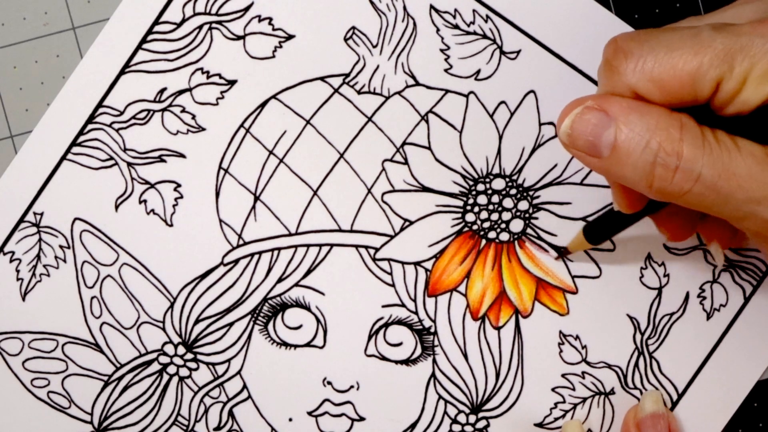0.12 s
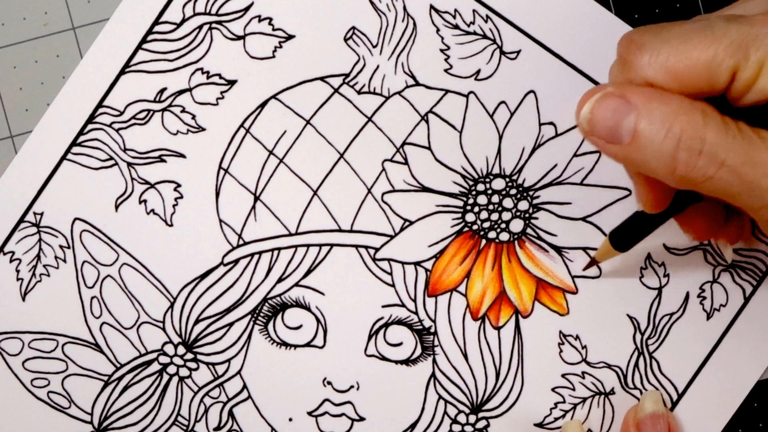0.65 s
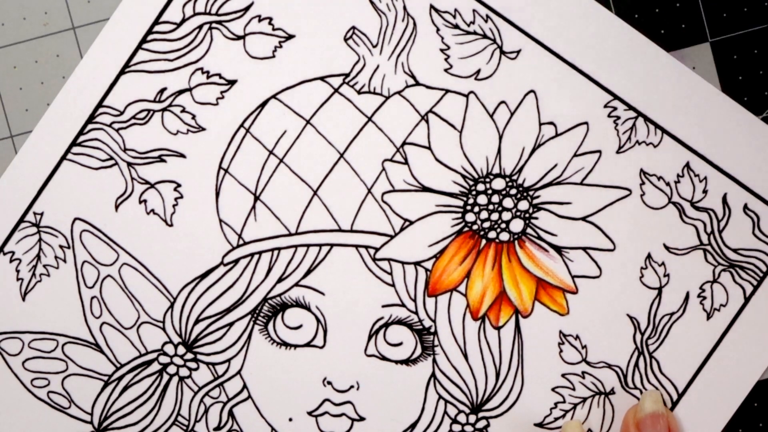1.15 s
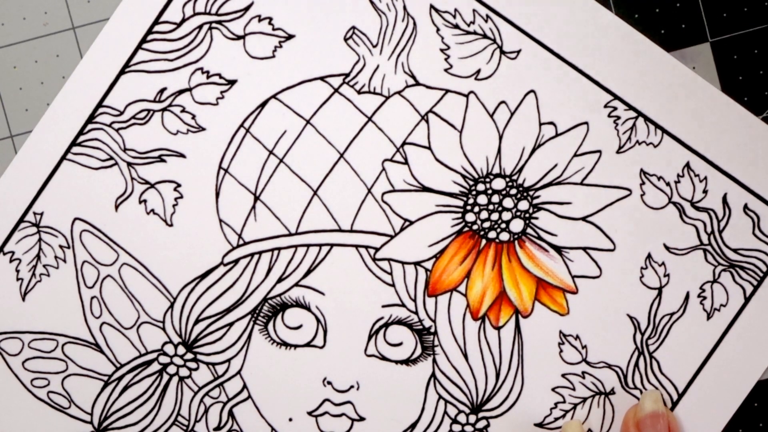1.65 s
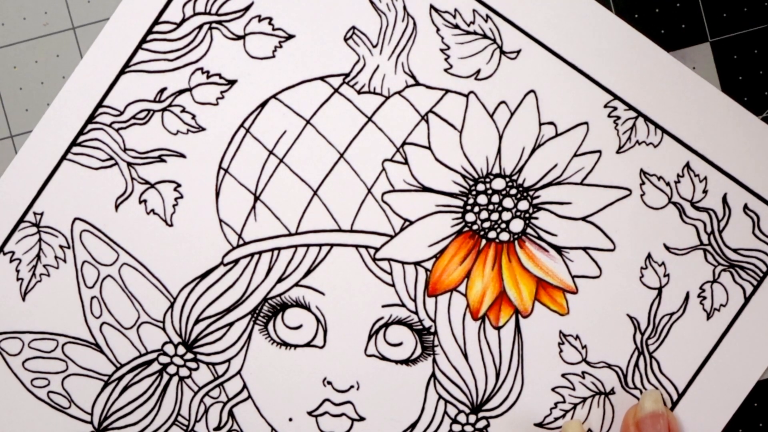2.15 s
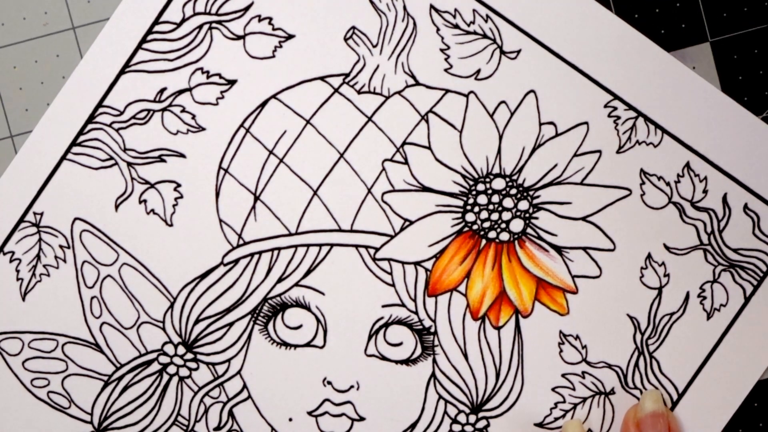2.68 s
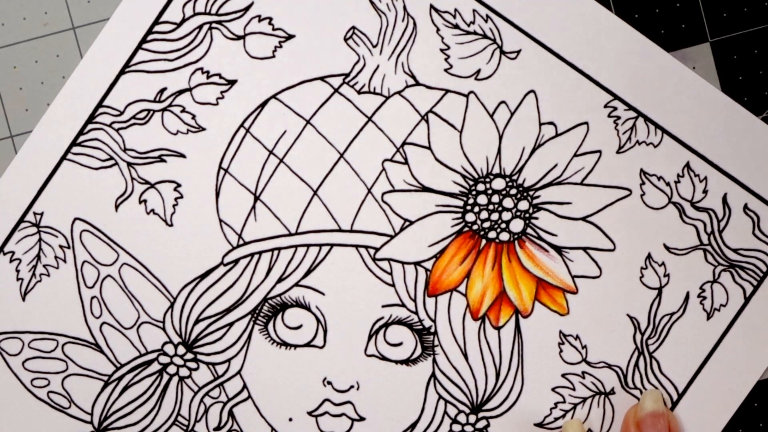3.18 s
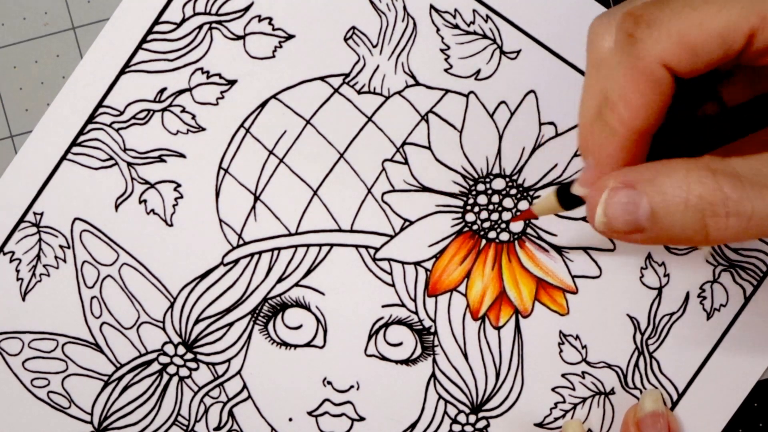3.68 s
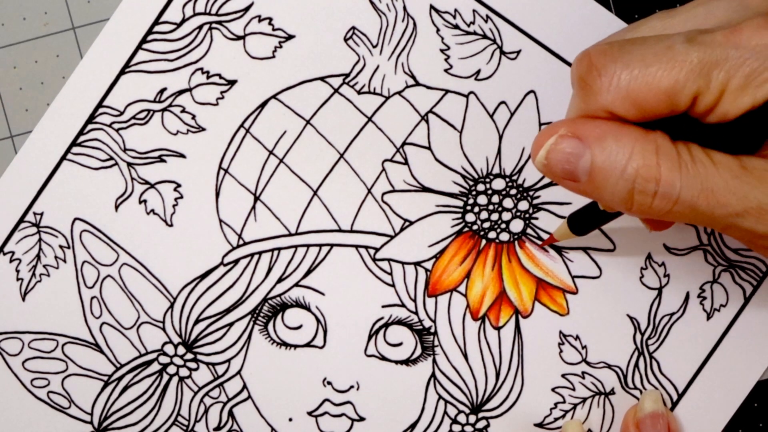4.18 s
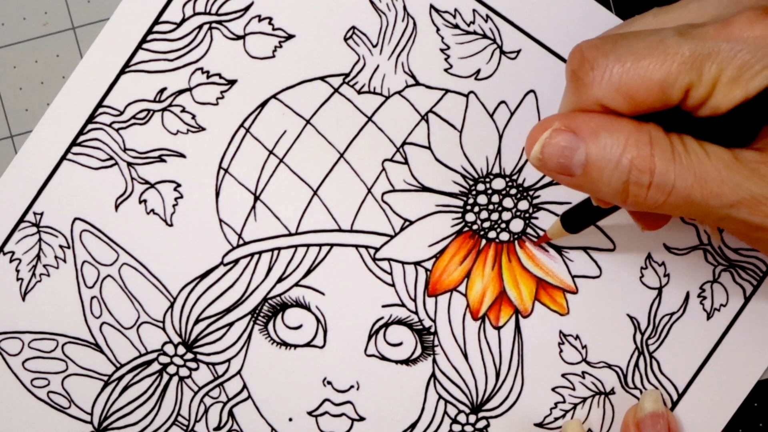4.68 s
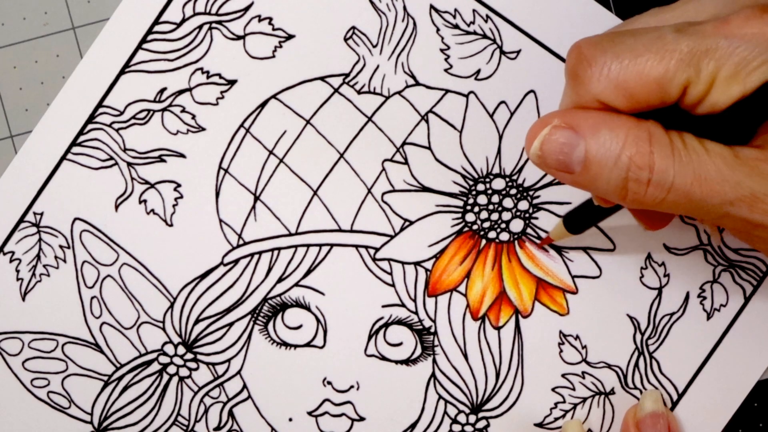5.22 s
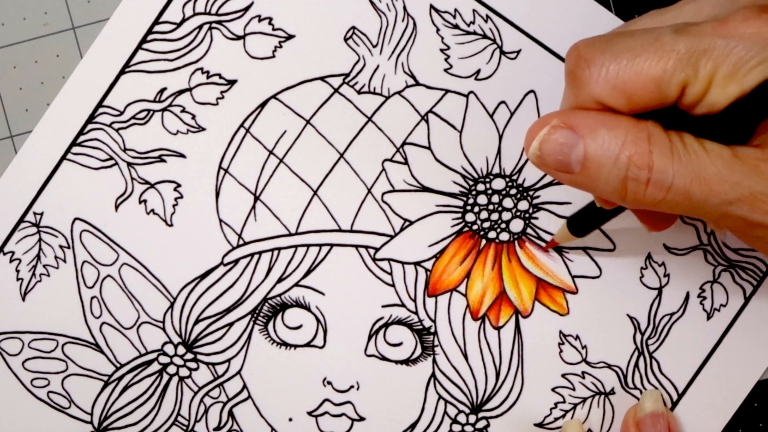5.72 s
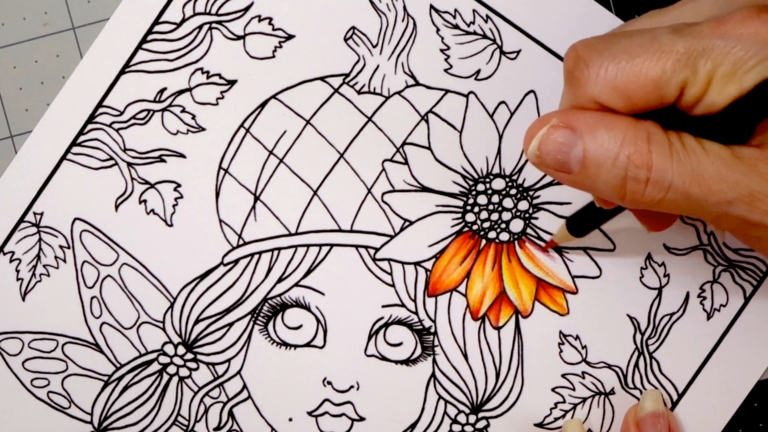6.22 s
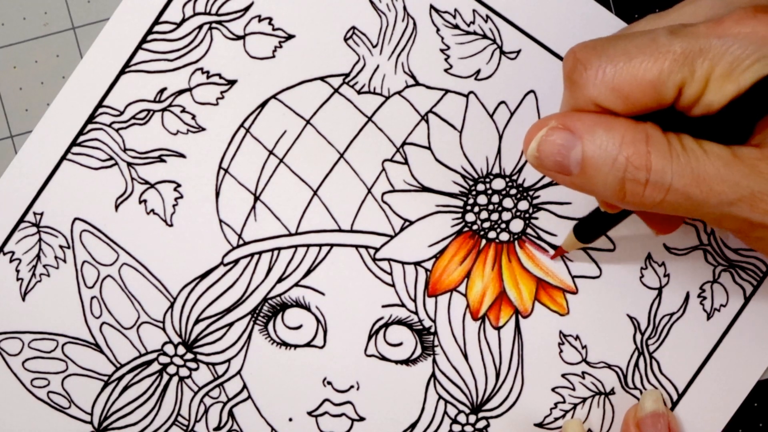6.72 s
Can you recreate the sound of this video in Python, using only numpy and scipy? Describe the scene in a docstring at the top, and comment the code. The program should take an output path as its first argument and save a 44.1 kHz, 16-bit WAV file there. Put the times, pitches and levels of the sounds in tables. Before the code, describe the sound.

Brief papery pencil strokes, about four a second, stop as the hand reaches away. Loose wooden pencils knock, rattle and scrape against each other in a tray, loudest at the first grab, then busier with bright ticks as one is drawn out. Things settle, then light, steady, quieter shading resumes. Dry, close recording with tiny room echoes and soft low hum.

```python
"""A quiet room with air-handling rumble and mains hum, filtered noise and a wavering sine, is heard throughout.
A hand shades paper in quick strokes: tiny catches of the lead excite the pencil's resonances.
It then rummages in a tray of pencils: catches scrape and rumble, bursts knock, and barrel modes sing.
Another pencil is drawn out along its neighbours; shading resumes in a second pencil's colour.
Two close microphones hear it all, with short echoes of the room."""
import sys
import numpy as np
from scipy import signal
from scipy.fft import rfft, irfft, next_fast_len
from scipy.io import wavfile

SR = 44100
rng = np.random.default_rng(int(sys.argv[2]) if len(sys.argv) > 2 else 0)


def linear_from_db(decibels):
    """Turn decibels (scalar or array-like) into linear amplitude factors; 0 gives 1."""
    return 10 ** (np.asarray(decibels, float) / 20)


def pcm_store(signal):
    """Save signal as 16-bit PCM."""
    levels = np.round(np.clip(np.atleast_2d(signal), -1, 1) * 32767)
    wavfile.write(sys.argv[1], SR, levels.astype(np.int16).T)


N = 302526

# room air alike on both sides, spectrum before scaling to unit rms: frequency_hz, density_db (per Hz)
AIR_SPECTRUM = [(18, -47), (25, -2.5), (35, 2.5), (50, -5), (91, -13.5), (101, -8.5), (123, -3.5),
                (147, -12), (188, -8.5), (218, -15.5), (436, -18.5), (917, -26), (1150, -32), (1750, -31),
                (2600, -36), (2870, -38.5), (11200, -44.5), (14600, -89.5), (22000, -120)]
# part of the room air opposite on the two sides, likewise: frequency_hz, density_db (per Hz)
DIFFUSE_SPECTRUM = [(12, -86), (20, -36), (190, -11.5), (282, -11), (306, -12), (409, -10.5), (593, -11),
                    (5930, -26), (11200, -31), (14600, -41), (22000, -120)]
AIR_RMS_DB, DIFFUSE_RMS_DB = -52, -63.5
HUM_HZ, HUM_RMS_DB = 120.2, -56.5

# shading strokes of the lead: start_s, length_s, hiss_db
STROKES = [(-.005, 0.098, -57), (0.273, 0.098, -55.5), (0.532, 0.088, -53.5), (4.573, 0.082, -64),
           (4.838, 0.079, -62), (5.079, 0.11, -58), (5.334, 0.12, -59.5), (5.59, 0.12, -59),
           (5.836, 0.12, -58), (6.089, 0.12, -56.5), (6.348, 0.11, -57.5), (6.618, 0.12, -59)]
SWAP_S = 2  # strokes after this moment use the second pencil
# resonances of each held pencil: frequency_hz, width_hz (of a single pass), level_db
FIRST_PENCIL = [(207, 120, 12), (1210, 630, -3), (2790, 400, -2.5), (4300, 750, -14), (5330, 820, -8),
                (6670, 1500, -6.5), (8430, 1200, -9), (9860, 850, 1)]
SECOND_PENCIL = [(214, 153, 12.5), (1160, 800, -2.5), (2720, 650, -13.5), (4200, 580, -14),
                 (5330, 540, -3.5), (6570, 980, -2), (8000, 450, -0.5), (8900, 710, 4.5), (10600, 800, -19)]
STROKE_COLOUR_DRIFT_DB = 1.9  # the grip shifts, so each resonance comes and goes
PAPER_RASP_DB = -6  # broad rasp of the sheet, re the pencil's resonances

# the hand shoves pencils about, 20 dB per swell or nominal fade:
# peak_s, swell_s, fade_s (at fade speed 1), scrape_db, rumble_db, hiss_db
SHOVES = [(.752, .03, 0.12, -57, -71, -62.5), (.838, 0.13, 0.14, -62.5, -70, -55.5),
          (.99, 0.2, 0.74, -70, -66.5, -63.5), (1.328, 0.028, 0.087, -55.5, -45, -64),
          (1.502, 0.028, 0.074, -27.5, -27.5, -43), (1.62, 0.17, 0.37, -56, -61, -65),
          (1.788, 0.017, 0.032, -44.5, -46.5, -63), (1.872, 0.12, .09, -42, -42, -58.5),
          (1.935, .08, 0.12, -45.5, -43.5, -55.5), (2.356, 0.02, 0.032, -36, -45, -65),
          (2.37, 0.13, 0.092, -49, -42, -78), (2.695, 0.062, 0.023, -38.5, -40.5, -52.5),
          (2.775, 0.25, 0.26, -45, -51.5, -59), (2.829, .1, 0.047, -59, -55, -54),
          (2.895, 0.025, .045, -35, -42, -35), (2.93, 0.065, .08, -49, -43, -62),
          (3.016, 0.14, 0.14, -46, -45.5, -64), (3.134, 0.12, 0.053, -45.5, -41, -83),
          (3.185, 0.047, 0.072, -55, -46, -70), (3.262, 0.11, 0.11, -59, -54.5, -60),
          (3.33, .02, 0.14, -60, -60, -60), (3.504, 0.17, 0.27, -56.5, -65, -59.5),
          (3.72, 0.44, 0.4, -75, -62.5, -67), (3.925, 0.14, 0.12, -51, -62, -58)]
# divisors of the fade times, the treble dying first: scrape, rumble, hiss (ratios)
SHOVE_FADE_SPEED = (1.11, 0.8, 1.4)
ROUNDNESS = 1.1  # exponent; above 1 the peaks of swells are rounded
# streams of catches, rows rumble, scrape, hiss: rate_per_s, spread_db
CATCHES = [(3010, 2.0), (1800, 3), (2180, 2)]
# modes of the tray: frequency_hz, width_hz, level_db
TRAY = [(203, 30.4, 0.5), (312, 30.4, 3.5), (341.6, 34.6, 2), (407, 26, -0.5), (515, 116, -6),
        (698, 64, -5), (828, 108, -8)]
# wood modes of scraped pencils: frequency_hz, width_hz, level_db
SCRAPE = [(1101, 123, 1.5), (1417, 144, 1), (1680, 210, -0.5), (1960, 280, -2.5), (2273, 150, -2),
          (2560, 350, 0.5), (2990, 350, 0.5), (3380, 220, -0.5), (4630, 1000, 3.5)]
# resonances of the fine hiss: frequency_hz, width_hz, level_db
HISS = [(6250, 3000, -5), (7960, 580, -1.5), (9630, 1200, -6.5)]
# the hissier a contact, the higher the wood modes that it picks
EVEN_SCRAPE_HZ, HISS_DB_PER_OCTAVE = 2500, 33.5
SCRAPE_SLOPE_DB = 9.5  # loss per octave away from the scrape centre

# knocks between pencils and tray: start_s, crack_peak_db, crack_hz, thud_db, treble_db (both re crack)
KNOCKS = [(0.8013, -44.5, 7840, -27, 6), (1.325, -43.5, 2790, -2, -24), (1.4384, -26, 4680, -18, -35),
          (1.4725, -13, 2040, -6.5, -25), (1.4834, -22, 1120, -4, -17), (1.496, -25.5, 2010, -5, -24),
          (1.5119, -34, 1360, 9, -22), (1.7848, -42, 2500, -4, -26), (1.9657, -33.5, 2560, -10, -22),
          (2.2767, -48, 2700, -10, -20), (2.354, -44.5, 1430, 12, -21), (2.64, -43, 1840, -19, -6),
          (2.652, -20, 4780, -26, -11.5), (2.6886, -38, 2370, -22, -19), (2.9585, -21, 2850, -8.5, -9.5),
          (3.1229, -41.5, 1300, 6, -24), (3.1578, -27, 4200, -13, -16), (3.257, -39.5, 4460, -14, -18),
          (3.3015, -24, 4400, -41, 9), (3.3284, -52, 4730, -12, -18)]
CONTACT_MS = 1.9  # time for a burst to fall to 1/e
BARREL_RING_DB, RING_FOLLOWS_TREBLE = 0, 0.095  # bright knocks ring the barrel more
# neighbours rattle after a knock: dB re the knock (scrape, rumble, hiss), delay, fade at fade speed 1
RATTLE_DB, RATTLE_LAG_S, RATTLE_FADE_S = (-14, -14, -22), 0.0022, 0.028
# share of a knock's thud dB that its rattle takes on: scrape, rumble, hiss (ratios)
RATTLE_FOLLOWS_THUD = (.25, .3, .15)

# a loose pencil rubbed or buzzing: peak_s, swell_s, fade_s, first_mode_db, second_mode_db, third_mode_db
BARREL_RUB = [(1.024, 0.52, .2, -72, -72, -69.5), (1.342, 0.14, .06, -68, -58.5, -70),
              (1.41, .15, .04, -78, -62, -69), (2.665, 0.013, 0.026, -54, -48, -61),
              (2.693, .05, 0.01, -46, -58, -59), (3.164, .008, .06, -60, -55, -75),
              (3.266, 0.09, 0.054, -76, -58.5, -64), (3.31, .008, .06, -44, -50, -57)]
# barrel modes: frequency_hz, width_hz (of a single pass), level_db (when knocked)
BARREL = [(2557, 88, -1.5), (4680, 230, -2.5), (7210, 420, -9.5)]
# level of a pencil drawn out along its neighbours: time_s, level_db
DRAW_OUT = [(2.71, -64), (2.73, -51), (2.75, -49), (2.766, -47), (2.778, -45), (2.87, -53.5)]
# modes of the drawn pencil: frequency_hz, width_hz (of a single pass), level_db
DRAWN_BARREL = [(920, 440, 5), (3430, 330, 2), (5070, 420, -4), (7050, 600, -5)]

PAPER_LAG_US, TRAY_LAG_US = 20, 28.7  # how much later the left side hears each place
ROOM_T60_S, ROOM_DB, WALL_CUT_HZ = 0.27, -16, 8800  # T60 before the walls' treble loss
ROOM_ALIKE_BELOW_HZ = 990


def rms_one(x):
    """Normalisation: scale to unit rms."""
    return x / np.sqrt(np.mean(x ** 2) + 1e-20)


def drift(rate):
    """Slow random modulation: Gaussian steps of spread 1, rate per second, joined by straight lines."""
    steps = rng.standard_normal(int(N / SR * rate) + 2)
    return np.interp(np.arange(N) / SR * rate, np.arange(len(steps)), steps)


def coloured(spectrum):
    """Spectral shaping: white noise filtered to a density in dB per Hz, at unit rms."""
    hz = np.maximum(np.arange(N // 2 + 1) * SR / N, 1)
    table_hz, table_db = np.transpose(spectrum)
    shape_db = np.interp(np.log(hz), np.log(table_hz), table_db)
    return rms_one(irfft(rfft(rng.standard_normal(N)) * linear_from_db(shape_db), N))


def band(x, low_hz, high_hz):
    """Band limitation: Butterworth band-pass."""
    return signal.sosfilt(signal.butter(2, [low_hz, high_hz], "band", fs=SR, output="sos"), x)


def grit(per_s, spread_db):
    """Random impulse process: tiny catches at random moments, a few much larger than the rest."""
    sizes = linear_from_db(spread_db * np.minimum(rng.exponential(1, N), 4)) * rng.choice([-1, 1], N)
    return sizes * (rng.random(N) < per_s / SR)


def resonate(x, modes):
    """Modal superposition: parallel two-pole resonances of alternating sign."""
    out = 0
    for k, (hz, width_hz, db) in enumerate(modes):
        r = np.exp(-np.pi * max(width_hz, 5) / SR)  # pole radius sets the damping
        poles = [1, -2 * r * np.cos(2 * np.pi * hz / SR), r * r]
        zeros = [(1 - r * r) / 2, 0, (r * r - 1) / 2]
        out = out + (-1) ** k * linear_from_db(db) * signal.lfilter(zeros, poles, x + 1e-18)
    return out


def sharply(x, modes):
    """Cascaded resonance: each mode is applied twice, leaving dark valleys between modes."""
    out = []
    for hz, width_hz, db in modes:
        mode = [(hz, width_hz, 0)]
        out.append(linear_from_db(db) * resonate(resonate(x, mode), mode))
    return out


def swells(rows, fade_speed):
    """Incoherent addition: rows swell and fade almost steadily in dB, and their powers add."""
    t, power = np.arange(N) / SR, np.full((3, N), 1e-16)
    for s, swell_s, fade_s, *db in rows:
        near = slice(max(round((s - 3 * swell_s) * SR), 0), round((s + 4 * fade_s) * SR))
        before = np.maximum(s - t[near], 0) / swell_s
        after = np.maximum(t[near] - s, 0) / fade_s
        fall_db = 20 * (before + np.outer(fade_speed, after)) ** ROUNDNESS
        power[:, near] += linear_from_db(np.array(db)[:, None] - fall_db) ** 2
    return np.sqrt(power)


def background():
    """Ambient field: air noise common to both sides, an opposed part, and a wavering hum."""
    waver_db = 1.3 * drift(3)
    hum = np.sqrt(2) * linear_from_db(HUM_RMS_DB + waver_db) * np.sin(2 * np.pi * HUM_HZ * np.arange(N) / SR)
    air = linear_from_db(AIR_RMS_DB) * coloured(AIR_SPECTRUM)
    diffuse = linear_from_db(DIFFUSE_RMS_DB) * coloured(DIFFUSE_SPECTRUM)
    return air + hum + diffuse * [[1], [-1]]


def strokes(rows, pencil):
    """Friction excitation: the lead catches on the paper tooth as the hand speeds up and slows."""
    t, speed = np.arange(N) / SR, 0
    for s, length, db in rows:
        arc = np.sin(np.pi * np.clip((t - s) / length, 0, 1))
        speed = speed + linear_from_db(db) * arc ** 0.64
    catches = grit(7000, spread_db=2.5)
    body = sum(linear_from_db(STROKE_COLOUR_DRIFT_DB * drift(25)) * mode for mode in sharply(catches, pencil))
    rasp = rms_one(band(catches, 900, 10800))
    scratch = rms_one(body) + linear_from_db(PAPER_RASP_DB) * rasp
    return speed * linear_from_db(0.78 * drift(60)) * scratch


def rattles():
    """Secondary excitation: every knock leaves its neighbours rattling, in rows like the shoves."""
    rows = []
    for s, db, crack_hz, thud_db, treble_db in KNOCKS:
        levels_db = db + np.array(RATTLE_DB) + thud_db * np.array(RATTLE_FOLLOWS_THUD)
        rows.append((s + RATTLE_LAG_S, RATTLE_LAG_S, RATTLE_FADE_S, *levels_db))
    return rows


def rummage():
    """Selective modal excitation: clumped catches shake the tray, hiss, and pick which wood modes speak."""
    scrape, rumble, hiss = swells(SHOVES + rattles(), SHOVE_FADE_SPEED)
    centre_octave = np.log2(EVEN_SCRAPE_HZ) + 20 * np.log10(hiss / scrape) / HISS_DB_PER_OCTAVE
    low, mid, high = [grit(per_s, spread_db) * linear_from_db(1.74 * drift(90)) for per_s, spread_db in CATCHES]
    wood, share_power = 0, 0
    for k, mode in enumerate(SCRAPE):
        hz, width_hz, db = mode
        share = linear_from_db(db - SCRAPE_SLOPE_DB * np.abs(centre_octave - np.log2(hz)))
        wood = wood + (-1) ** k * share * rms_one(resonate(mid, [mode]))
        share_power = share_power + share ** 2
    wood = wood / np.sqrt(share_power)  # the choice of modes leaves the level alone
    return rumble * rms_one(resonate(low, TRAY)) + scrape * wood + hiss * rms_one(resonate(high, HISS))


def knocks():
    """Impact excitation: a short dying burst gives a crack, its treble, a tray thud and a barrel ring."""
    out, t = np.zeros(N), np.arange(round(.08 * SR)) / SR
    for s, db, crack_hz, thud_db, treble_db in KNOCKS:
        burst = rng.standard_normal(len(t)) * np.exp(-1000 * t / CONTACT_MS)
        ring_db = BARREL_RING_DB + RING_FOLLOWS_TREBLE * treble_db
        layers = [(0, band(burst, 0.78 * crack_hz, 1.216 * crack_hz)),
                  (thud_db, resonate(burst, TRAY + SCRAPE[:2])),
                  (treble_db, band(burst, 5500, 10500)),
                  (ring_db, resonate(burst, BARREL))]
        at = round(s * SR)
        out[at:at + len(t)] += sum(linear_from_db(db + rel_db) * x / np.abs(x).max() for rel_db, x in layers)
    return out


def barrel_rub(slip):
    """Stick-slip friction: skin slipping on lacquer feeds each barrel mode unevenly."""
    out = 0
    for gain, mode in zip(swells(BARREL_RUB, np.ones(3)), sharply(slip, BARREL)):
        out = out + gain * linear_from_db(3.0 * drift(50)) * rms_one(mode)
    return out


def draw_out(slip):
    """Sliding friction: a pencil drawn along its neighbours sounds its unsteady barrel modes."""
    t = np.arange(N) / SR
    s, db = np.transpose(DRAW_OUT)
    fade = np.clip(1 + np.minimum(t - s[0], s[-1] - t) / .004, 0, 1)  # 4 ms beyond either end
    drawn = sum(linear_from_db(3.5 * drift(40)) * mode for mode in sharply(slip, DRAWN_BARREL))
    return fade * linear_from_db(np.interp(t, s, db)) * rms_one(drawn)


def pair(x, lag_us):
    """Interchannel delay: of two close microphones, the left one hears the sound slightly later."""
    late = np.exp(-2j * np.pi * np.arange(N // 2 + 1) * SR / N * lag_us / 1e6)
    return np.array([irfft(rfft(x) * late, N), x])


def room(x):
    """Reverberation by recirculation: six feedback delays a side, duller on every round."""
    size = next_fast_len(N + SR)
    w = 2 * np.pi * np.arange(size // 2 + 1) / size
    dull = 1 / (1 + 1j * w * SR / (2 * np.pi * WALL_CUT_HZ))
    echo = np.zeros((2, len(w)), complex)
    for k, lag in enumerate((rng.uniform(0.0034, .03, 12) * SR).astype(int)):
        loop = linear_from_db(-60 * lag / SR / ROOM_T60_S) * dull * np.exp(-1j * w * lag)
        echo[k % 2] += (-1) ** (k // 2) * loop / (1 - loop)
    return irfft(rfft(x, size) * echo, size)[:, :N]


def scene():
    """Superposition: direct paper and tray sounds, their room echoes and the background add."""
    ambience = background()
    paper = (strokes([row for row in STROKES if row[0] < SWAP_S], FIRST_PENCIL)
             + strokes([row for row in STROKES if row[0] > SWAP_S], SECOND_PENCIL))
    slip = grit(2500, spread_db=4.5)
    tray = rummage() + knocks() + barrel_rub(slip) + draw_out(slip)
    direct = pair(paper, PAPER_LAG_US) + pair(tray, TRAY_LAG_US)
    left, right = linear_from_db(ROOM_DB) * room(paper + tray)
    # long waves reach both microphones alike
    side = signal.lfilter(*signal.butter(1, ROOM_ALIKE_BELOW_HZ, "high", fs=SR), left - right) / 2
    return direct + (left + right) / 2 + side * [[1], [-1]] + ambience


def low_pass(x):
    """Removes everything above the highest recorded frequency."""
    return signal.sosfilt(signal.butter(12, 12200, fs=SR, output="sos"), x)


def record(dry):
    """Band limitation: a bass roll-off below 52 Hz and a steep top cut at 11 kHz."""
    bass_cut = signal.sosfilt(signal.butter(3, 52, "high", fs=SR, output="sos"), dry)
    mix = signal.sosfilt(signal.ellip(12, .5, 45, 11000, fs=SR, output="sos"), bass_cut)
    return low_pass(mix)


dry = scene()
out = record(dry)
pcm_store(out)
```